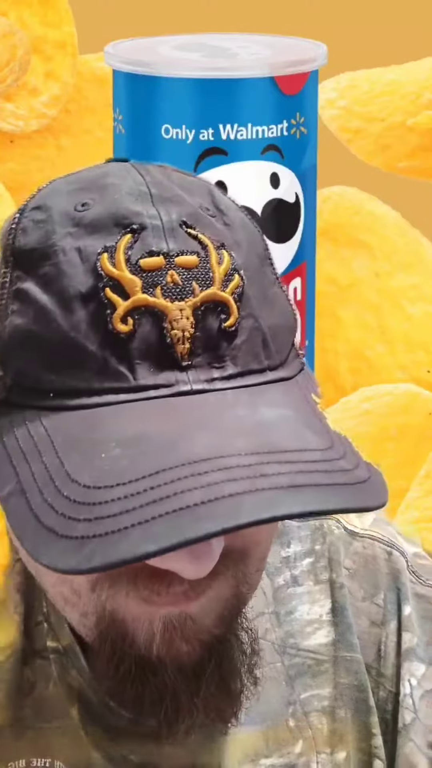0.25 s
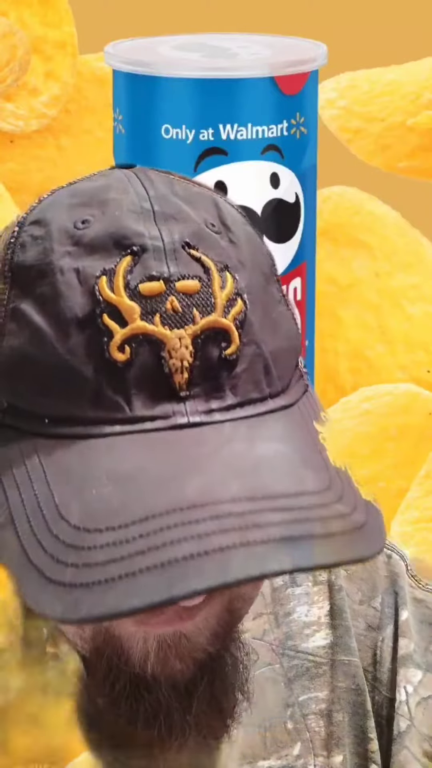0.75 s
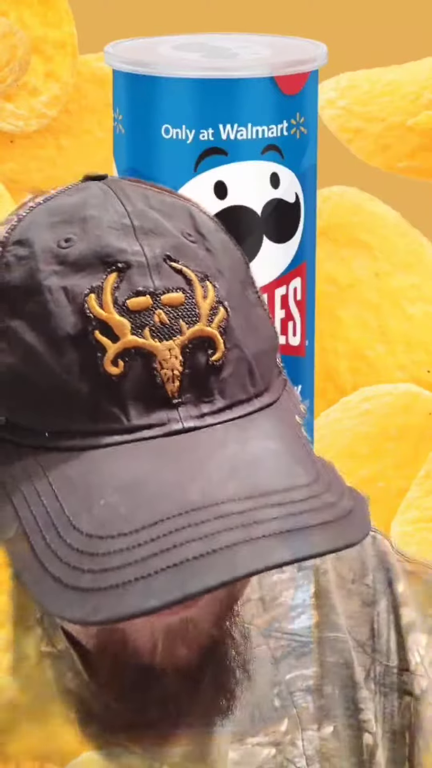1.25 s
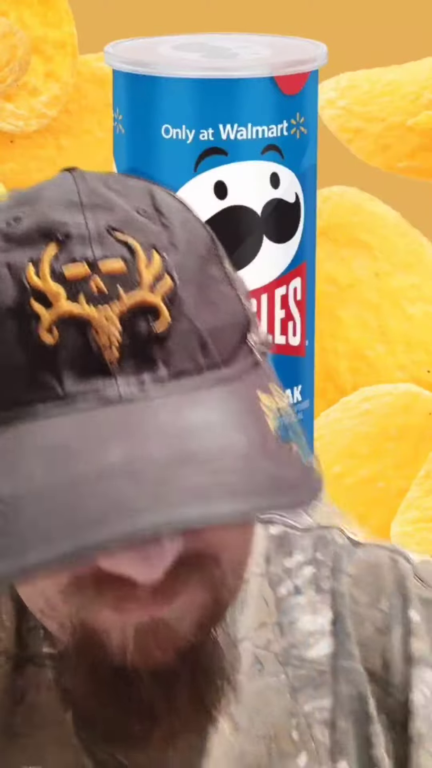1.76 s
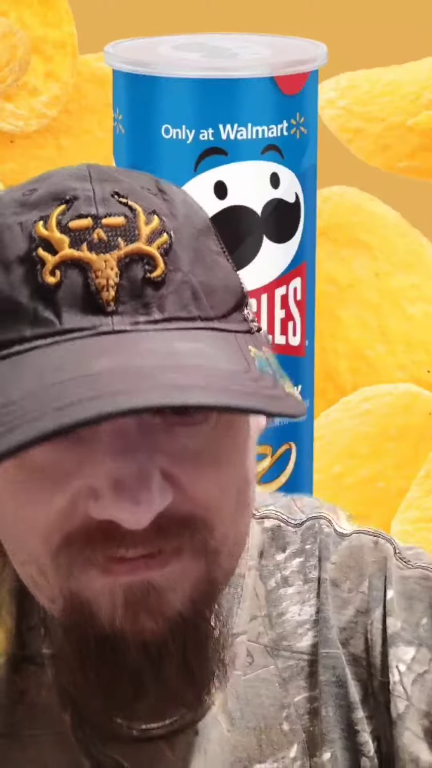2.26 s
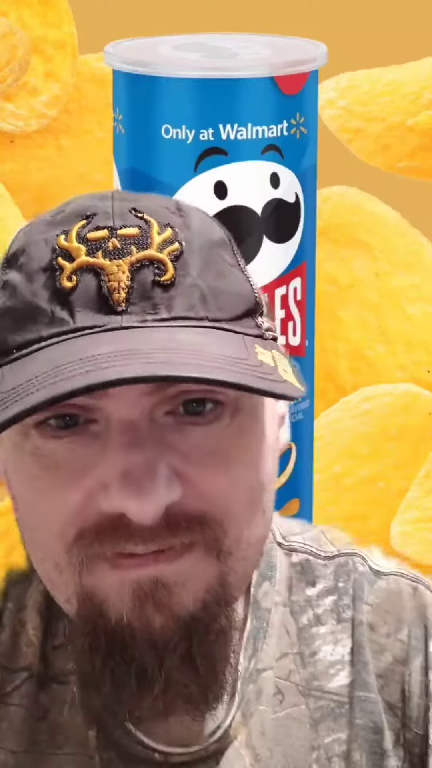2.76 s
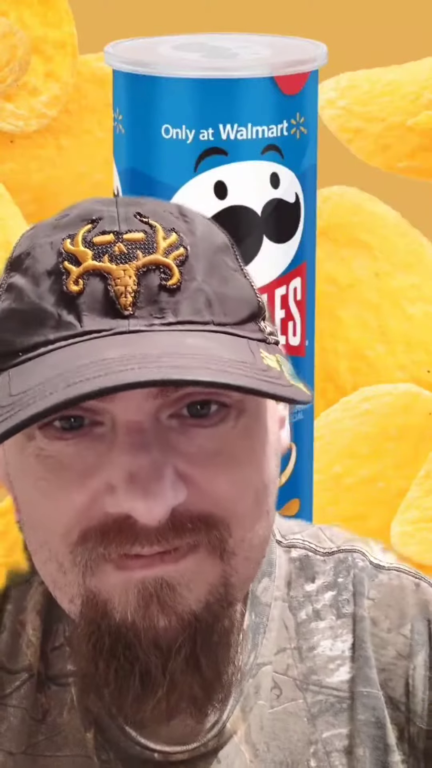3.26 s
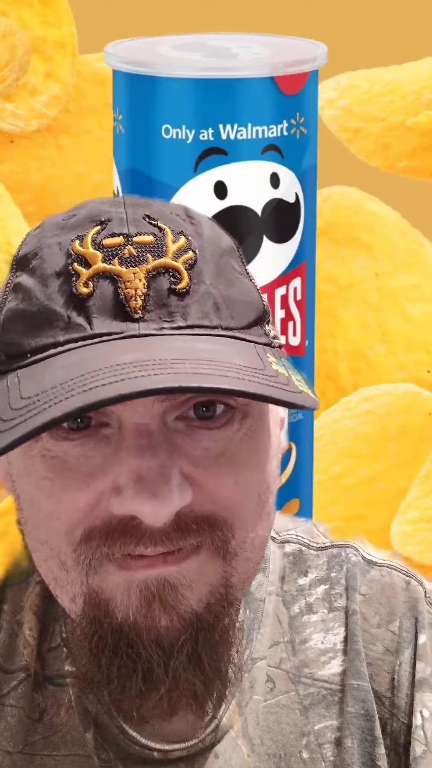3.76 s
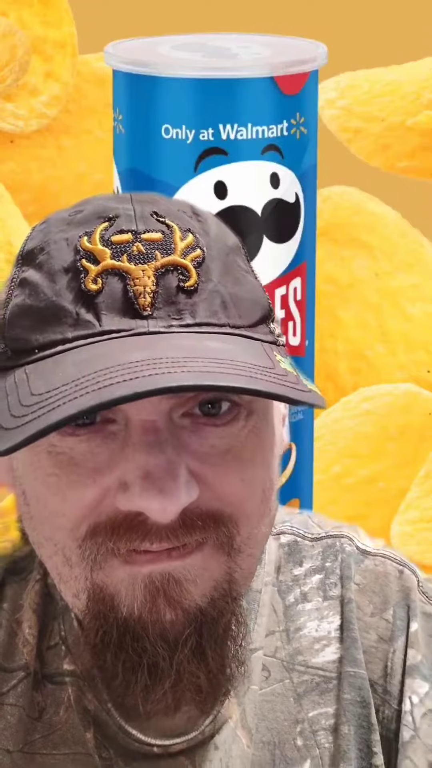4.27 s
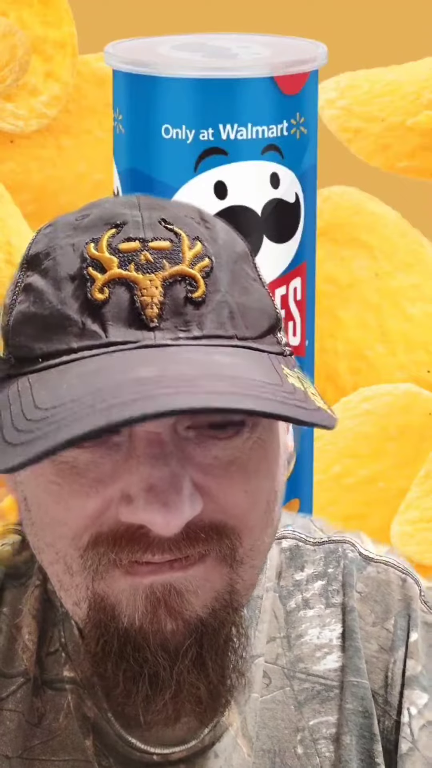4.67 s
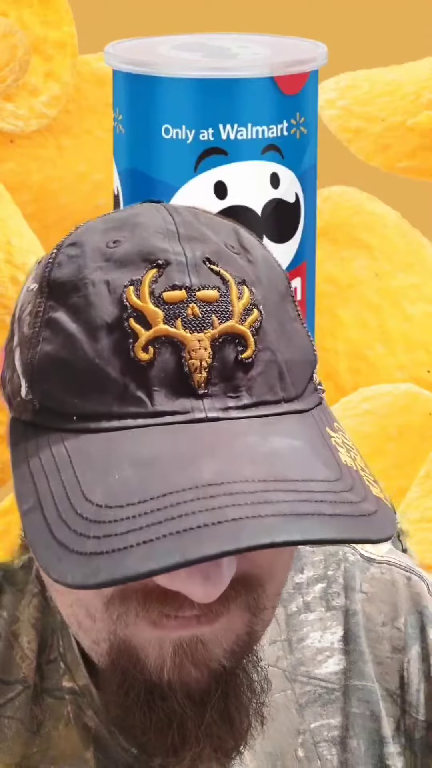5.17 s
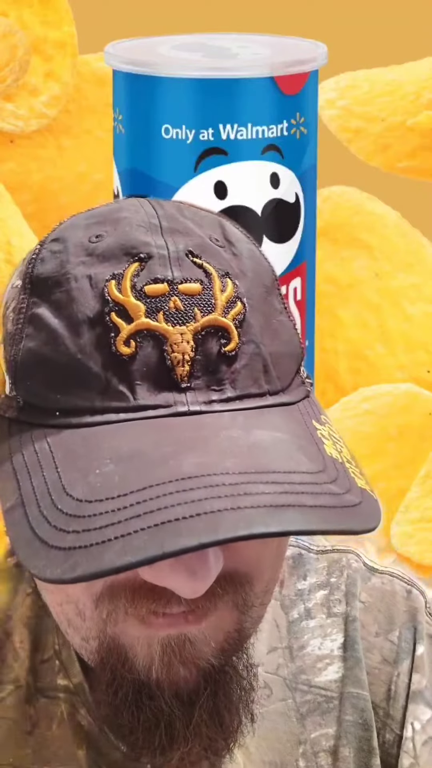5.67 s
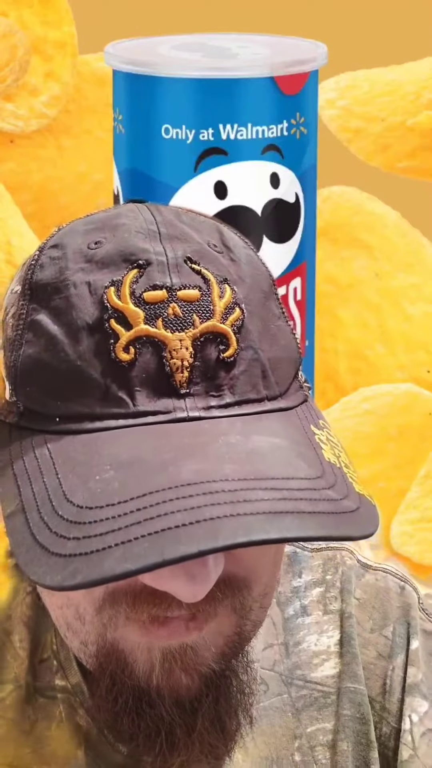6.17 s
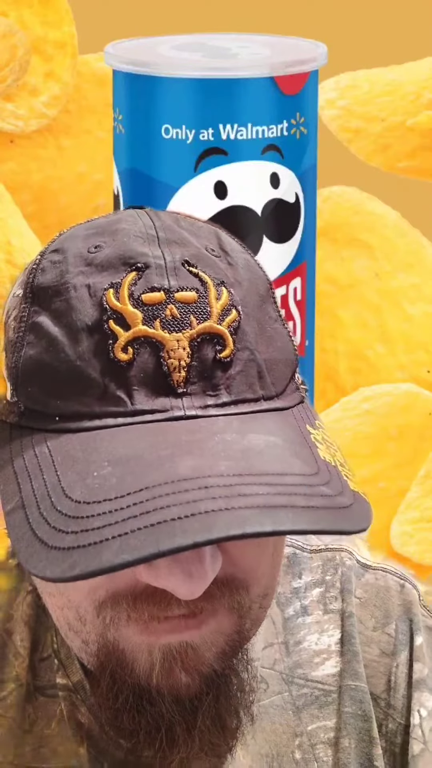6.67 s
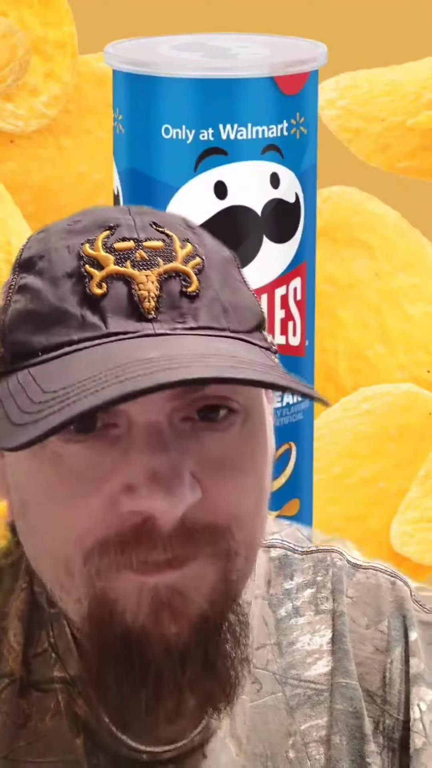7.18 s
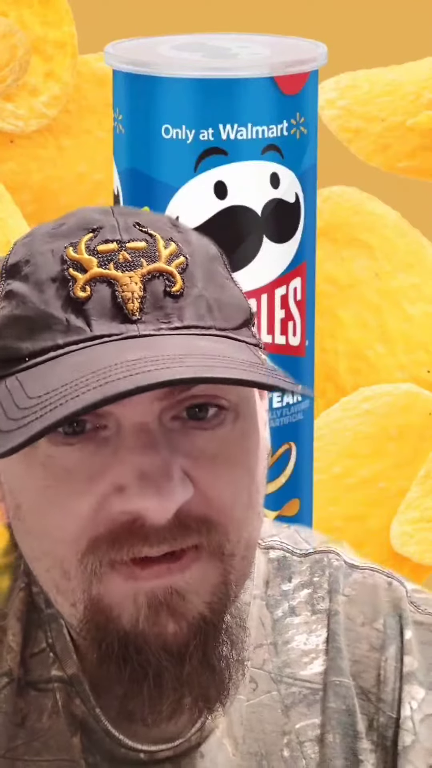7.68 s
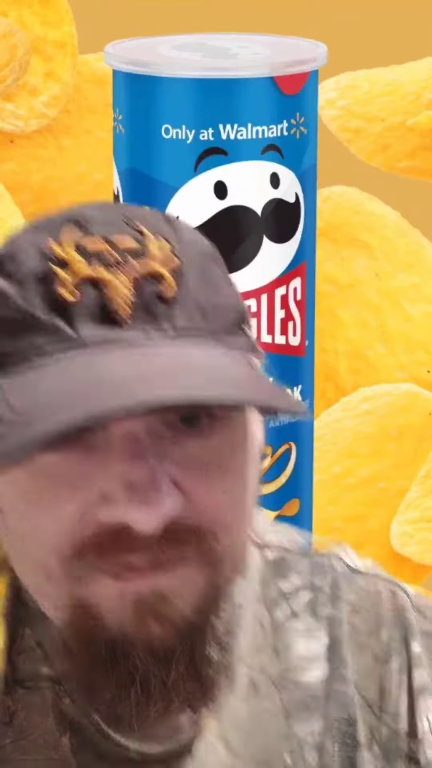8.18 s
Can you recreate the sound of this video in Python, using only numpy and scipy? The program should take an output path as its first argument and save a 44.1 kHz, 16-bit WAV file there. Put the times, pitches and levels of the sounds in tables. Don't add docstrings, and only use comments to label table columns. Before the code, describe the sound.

A small, quiet indoor room with a soft steady hush, a very faint low appliance hum and a short echo; the phone microphone is very close. From 0 to 0.9 s, fingers scuff a cardboard tube, with small taps and a firmer clack near 0.5. Around 0.95-1.1 s the plastic lid pops off in a loud, tight cluster of hollow, woody clacks, the loudest moment, trailing off in little taps. From 1.9 to 4.5 s it is nearly quiet: faint rubbing and sparse, tiny nail ticks, a few clearer near 2.7 and 3.25, while a distant chair groans low, sliding down, at 2.1-2.7. At 4.6 s the foil seal snaps loose, crackling in bright uneven jerks until about 5.4, with low hollow booms from the tube. From 5.7 s crisps softly slide and knock, strongest near 7.0 and 7.45, fading into light rustle by 8.4.

```python
import sys
import numpy as np
from scipy import signal
from scipy.fft import rfft, irfft, next_fast_len
from scipy.io import wavfile
from scipy.ndimage import uniform_filter1d, map_coordinates

SR = 44100
rng = np.random.default_rng(int(sys.argv[2]) if len(sys.argv) > 2 else 0)


def decibels_to_gain(level_db):
    exponent = np.asarray(level_db, float) / 20
    return 10 ** exponent


def int16_out(signal):
    q = np.round(np.clip(np.atleast_2d(signal).T, -1, 1) * 32767)
    wavfile.write(sys.argv[1], SR, q.astype(np.int16))


N = 371013

# (frequency [Hz], density [dB per Hz])
ROOM_TONE = [(15, -25), (25, -6.5), (103, 0), (240, -8), (358, -6.5), (563, -12.5), (644, -11), (1040, -16),
             (1870, -13.5), (2190, -20), (4150, -19), (13400, -31.5), (14500, -39.5)]
# (frequency [Hz], level [dB rms])
APPLIANCE_HUM = [(59, -80.5), (178, -80.5), (292, -77.5), (361, -75.5)]
# (frequency [Hz], t60 [s])
ROOM_DECAY = [(150, 0.33), (1000, 0.16), (4000, 0.2), (12000, 0.33)]
# (time [s], pitch [Hz], level [dB])
CHAIR_GROAN = [
    (2.02, 109.3, -75),
    (2.206, 106.4, -57.5),
    (2.338, 109, -59),
    (2.4, 98, -53),
    (2.438, 94.8, -61),
    (2.47, 95.5, -52),
    (2.694, 96.4, -62.5),
    (2.764, 82.5, -77),
    (2.8, 85, -77),
]

# (frequency [Hz], width [Hz], level [dB])
WALL = [(689.3, 360, 3), (986, 270, 8), (1234, 670, 4), (1670, 320, -4)]
# (frequency [Hz], width [Hz], level [dB])
FOIL = [(2060, 964, 1), (3240, 773, 2), (4030, 875, -1)]
# (frequency [Hz], width [Hz], level [dB])
END_DISC = [(1480, 460, -3.5), (2485, 1100, 1.5)]
# (frequency [Hz], width [Hz], level [dB])
AIR_COLUMN = [(178, 90, -7.5), (237.5, 46, 0.5), (429, 320, -6)]
# (frequency [Hz], density [dB per Hz])
FIZZ = [(2800, -54), (4800, 3), (6500, -5), (9000, -7), (13800, -10), (15500, -46)]
# (frequency [Hz], density [dB per Hz])
SPARKLE = [(2000, -30), (4000, -1.5), (6500, -4.5), (9000, -12.5), (13800, -11.5), (15500, -46.5)]

# (time [s], peak [dB], boom [Hz], t60 [s])
THUMPS = [(0.215, -45.5, 195, 0.059), (0.482, -30, 390, 0.026), (0.701, -54, 336, 0.066),
          (0.848, -40.5, 160, 0.028), (1.021, -14, 338.3, 0.025), (1.024, -28, 118, 0.071),
          (1.026, -26, 540, 0.06), (3.493, -57, 92, 0.065), (4.612, -21.5, 112, 0.078),
          (4.614, -32, 72, 0.19), (4.622, -22.5, 178, 0.099), (4.68, -36.5, 214.5, 0.2),
          (4.897, -34.5, 221.7, 0.33), (4.923, -37.5, 239.3, 0.19), (5.097, -33.5, 306, 0.11),
          (5.181, -43.5, 527, 0.033), (5.308, -40.5, 445, 0.051), (5.341, -45, 100, 0.083),
          (6.521, -37.5, 188, 0.02), (6.708, -55, 246, 0.28), (6.862, -48, 259, 0.13),
          (7.139, -54.5, 122, 0.12), (7.446, -37.5, 275.5, 0.19), (7.901, -52, 244, 0.18)]

# (time [s], length [s], first pressure [dB],
# last pressure [dB], brightness [dB])
PRISING = [(0, 0.33, -56, -65.5, -6.5), (.215, 0.028, -65, -58, -18), (.29, 0.23, -80, -54, -11),
           (.487, 0.01, -31, -47.5, -20), (.66, .06, -66, -52.5, -16), (.797, 0.11, -43.5, -61, -8),
           (.9, 0.045, -66, -62.5, -13), (.944, 0.019, -28, -36.5, -7.5), (.97, .05, -44.5, -35, -0.5),
           (1.024, 0.015, -26, -25, -5.5), (1.04, 0.047, -23, -37, -3), (1.12, 0.17, -35.5, -67, -40),
           (1.357, 0.2, -59, -71, -27), (1.68, 0.024, -52.5, -47.5, -1), (1.71, 0.15, -51, -72, 1),
           (1.835, 0.055, -59, -57.5, -5.5)]
# (time [s], length [s], first pressure [dB], last pressure [dB], brightness [dB])
FEELING = [(1.9, 0.504, -66, -71, -2), (2.39, 0.025, -76.5, -82, 22.5), (2.45, 0.32, -69.5, -61.5, -0.5),
           (2.685, 0.16, -70, -56, -3.5), (2.9, 0.14, -64.5, -58.5, -2), (3.08, 0.13, -76, -61.5, 1.5),
           (3.243, .02, -66, -75, 0), (3.31, 0.061, -69, -61.5, 7.5), (3.56, 0.025, -59.5, -57, 1),
           (3.59, 0.072, -78.5, -68.5, 6.5), (3.78, 0.21, -69, -62, -2.5), (3.96, 0.089, -70, -82, -6),
           (4.15, 0.17, -79.5, -67.5, 0.5), (4.36, 0.082, -80, -67, 3), (4.5, 0.026, -66, -70, -11),
           (4.57, 0.048, -90, -59, 4)]
# (time [s], length [s], first pressure [dB], last pressure [dB], brightness [dB])
PEELING = [(4.625, 0.12, -27, -46, -3.5), (4.805, 0.018, -45, -56, -19), (4.83, 0.089, -43, -29, -10),
           (4.929, 0.032, -21, -34, -6.5), (4.96, 0.076, -32.5, -32, -5.5), (5.04, 0.096, -35, -28, -10.5),
           (5.18, 0.031, -55, -59, 2.5), (5.243, 0.035, -37.5, -50, -27), (5.308, 0.077, -42, -47.5, -2.5),
           (5.36, 0.044, -41, -46, -12), (5.44, 0.2, -63.5, -65, -9)]
# (time [s], length [s], first pressure [dB],
# last pressure [dB], brightness [dB])
TILTING = [(5.74, 0.046, -46, -53, -4.5), (5.81, 0.28, -60.5, -55.5, -3.5),
           (6.105, 0.034, -47, -53.5, -4.5), (6.17, 0.036, -49, -61, -6.5), (6.23, 0.06, -59, -54, -5),
           (6.33, .13, -58, -49.5, -4.5), (6.46, 0.25, -52.5, -49.5, -5.5), (6.7, 0.27, -57, -56, -4.5),
           (6.945, 0.032, -44.5, -45, -3), (6.977, 0.025, -34.5, -46.5, -1.5),
           (7.08, 0.059, -58, -44, -3.5), (7.14, 0.21, -51.5, -48.5, -5.5),
           (7.37, 0.06, -52.5, -37.5, -4.5), (7.447, 0.029, -25.5, -36, -4.5), (7.5, 0.083, -50, -36.5, -8),
           (7.585, 0.07, -53, -49.5, -5.5), (7.7, 0.085, -51.5, -57, -1.5), (7.79, 0.26, -56, -55, -2.5),
           (8, 0.15, -58, -57.5, -3), (8.22, 0.063, -62.5, -62.5, 0), (8.3, 0.14, -71, -68, 1)]
# (strokes, fizz over foil [dB], air column over wall [dB], end disc over wall [dB],
# release [dB per s])
ACTIONS = [
    (PRISING, -3.5, -6.5, -12, 500),
    (FEELING, -5.5, -9, -6.5, 400),
    (PEELING, -1.5, -7, -6, 3600),
    (TILTING, -6, -4.5, -11.5, 330),
]

# (time [s], peak [dB], ring [Hz], sharpness [dB])
LID_SNAPS = [(0.281, -51.5, 910, -35), (0.325, -47, 920, -55), (0.376, -39, 870, -32),
             (0.484, -19, 1049, -23), (0.64, -51, 1120, -26), (0.794, -24, 1300, -15.5),
             (0.815, -39.5, 850, -11), (0.83, -38, 422, -34), (0.854, -36, 980, -30),
             (0.915, -52.5, 3495, -10.5), (0.941, -27.5, 1200, -21), (0.95, -18.5, 888, -25),
             (0.976, -31, 1420, -25), (0.987, -23.5, 1340, -15), (1, -12.5, 4020, -34.5),
             (1.004, -5.5, 1100, -15), (1.022, -4.5, 836, -18.5), (1.0245, -7, 3960, -17.5),
             (1.032, -13, 1220, -24.5), (1.041, -16, 950, -18), (1.065, -14.5, 844, -23.5),
             (1.155, -30, 1083, -24), (1.235, -46.5, 1990, -23), (1.362, -34.5, 1438, -59),
             (1.839, -33.5, 976, -47)]
# (time [s], peak [dB], ring [Hz], sharpness [dB])
NAIL_TICKS = [(2.112, -52, 2106, -0.5), (2.217, -47, 1990, -58), (2.397, -50, 1890, -5),
              (2.681, -25, 1613, -54), (2.819, -39.5, 2502, -26), (2.973, -44.5, 1901, -10),
              (3.028, -52, 1830, 1), (3.038, -44.5, 2617, 5), (3.147, -43.5, 5000, -27),
              (3.181, -55, 2533, 4), (3.237, -49.5, 3920, 0), (3.248, -27.5, 1580, -32),
              (3.371, -40.5, 3660, -20), (3.501, -50.5, 3590, -30), (3.661, -46, 3530, -21),
              (3.865, -43, 1864, -31), (3.945, -41, 1320, -20.5), (4.413, -49.5, 3370, -19),
              (4.502, -49.5, 1423, -40)]
# (time [s], peak [dB], ring [Hz], sharpness [dB])
SEAL_SNAPS = [(4.617, -21, 814, -15.5), (4.62, -7, 4249, -19.5), (4.639, -36, 720, -9.5),
              (4.662, -19, 3228, -7), (4.672, -14, 2400, -20.5), (4.697, -9, 3350, -20),
              (4.714, -22, 3040, -14.5), (4.765, -38, 794, -39.5), (4.803, -27.5, 1437, -35),
              (4.811, -27.5, 3600, -15), (4.816, -20.5, 1920, -14.5), (4.861, -26.5, 819, -35),
              (4.886, -23, 2330, -40.5), (4.924, -8.5, 2950, -6.5), (4.948, -18.5, 2394, -4),
              (4.997, -25, 1914, -4.5), (5.04, -18, 2524, -44), (5.093, -23, 990, -43),
              (5.126, -21, 2128, -14), (5.178, -25, 1136, -16), (5.242, -24.5, 2215, -30),
              (5.251, -33.5, 958, -26), (5.266, -39.5, 2050, -19), (5.306, -29.5, 4280, -9),
              (5.317, -35, 1814, 3.5), (5.339, -27.5, 2400, 0.5), (5.344, -33, 2470, 2),
              (5.366, -28.5, 655, -10)]
# (time [s], peak [dB], ring [Hz], sharpness [dB])
CRISP_KNOCKS = [(5.738, -35, 1223, -6.5), (5.759, -41, 1130, -25.5), (5.78, -38, 1120, -41),
                (6.109, -47, 820, -20), (6.248, -41, 857, -21), (6.277, -39, 3180, -42),
                (6.417, -42, 1841, -15), (6.697, -51, 646, 5.5), (6.864, -45, 755, -39),
                (6.946, -33.5, 910, -16), (6.977, -23.5, 1870, -33), (6.979, -25.5, 780, -42),
                (7.126, -36, 895, -38), (7.137, -30.5, 710, -45), (7.197, -35.5, 756, -43),
                (7.265, -35.5, 1050, -16), (7.346, -38, 760, -11.5), (7.413, -27, 980, -26),
                (7.444, -17, 884, -32), (7.483, -29, 850, -34), (7.521, -28, 1810, -31),
                (7.582, -34, 730, -30), (7.7, -45.5, 684, -13), (7.744, -39, 2830, -26.5),
                (7.753, -30, 2140, -23), (7.903, -42, 755, -17), (7.972, -39.5, 764, -3),
                (8.114, -45, 2600, -22), (8.204, -46.5, 1110, -11.5)]
# (time [s], peak [dB], ring [Hz],
# sharpness [dB])
FURTHER_SNAPS = [(1.005, -14.5, 2652, -34.5), (1.046, -15, 2305, -30), (1.073, -18, 900, -33),
                 (1.085, -26, 900, -31), (0.796, -27, 3200, -35), (1.118, -56, 907, -28), (1.124, -27, 1900, -40),
                 (4.3, -52, 1516, -60), (4.872, -27, 1810, -19), (4.876, -30, 3400, -31), (4.903, -30, 2360, -29),
                 (4.915, -31, 2900, -25.5), (4.934, -29, 2900, -20), (4.943, -24, 2000, -20),
                 (4.955, -35, 2500, -22), (5.005, -22, 2900, -21), (5.021, -31.5, 2288, -21),
                 (5.058, -26, 2473, -23), (5.069, -25, 2177, -33), (5.079, -24, 2428, -31),
                 (5.098, -30, 2789, -27), (5.11, -29, 1920, -30), (5.119, -31, 1207, -22), (5.835, -50, 3150, -11),
                 (5.894, -49, 720, -25), (5.998, -47, 780, -10), (6.121, -49, 880, -20), (6.17, -53, 765, -25),
                 (6.249, -38, 3054, -27), (6.443, -42, 3400, -16), (6.464, -43, 2990, -18), (6.61, -44, 800, -14),
                 (6.63, -44, 4790, -35), (6.7, -43, 2120, -18), (6.904, -52, 813, -25), (6.925, -48, 746, -11),
                 (7.385, -40.5, 776, -35), (7.432, -37, 920, -33), (7.451, -31, 3500, -25), (7.462, -27, 900, -20),
                 (7.474, -45, 950, -22), (7.518, -30.5, 780, -27), (7.573, -34, 1786, -27),
                 (7.735, -36, 1740, -28), (7.754, -28, 3300, -30), (7.82, -49, 966, -16), (8.291, -47, 2288, -10),
                 (8.354, -51.5, 2680, -16.5), (8.403, -52, 3025, -19.5)]


def unit(x):
    return x / np.sqrt(np.mean(x ** 2) + 1e-20)


def along(points, hz):
    f, v = np.transpose(points)
    return np.interp(np.log(hz + 1), np.log(f + 1), v)


def curves(rows):
    s, *cols = np.transpose(rows)
    return [np.interp(np.arange(N) / SR, s, c) for c in cols]


def wobble(rate):
    knots = rng.standard_normal(int(N * rate / SR) + 4)
    return map_coordinates(knots, [np.arange(N) * rate / SR])


def filtered(x, response):
    m = next_fast_len(N + SR // 2)
    return irfft(rfft(x, m) * response(np.fft.rfftfreq(m, 1 / SR)), m)[:N]


def coloured(x, points):
    return filtered(x, lambda f: decibels_to_gain(along(points, f)))


def body(modes):
    def response(f):
        total = 0
        for k, (centre, width, db) in enumerate(modes):
            total = total + (-1) ** k * decibels_to_gain(db) * 1j * f * width / (centre ** 2 - f * f + 1j * f * width)
        return total
    return response


def steep_body(modes):
    return lambda f: body(modes)(f) ** 2


def room_tone():
    t = np.arange(N) / SR
    hush_level = decibels_to_gain(-65.5 + 0.27 * wobble(0.65))
    tone = hush_level * unit(coloured(rng.standard_normal(N), ROOM_TONE))
    for hz, db in APPLIANCE_HUM:
        level = decibels_to_gain(db + 4.0 + 1.2 * wobble(3.8))
        tone += level * np.sin(2 * np.pi * hz * t + 1.1 * wobble(8.5))
    return tone


def room(x):
    out, step = np.zeros(N + SR), SR // 4
    for at in range(0, N, step):
        hz, t, z = signal.stft(rng.standard_normal(SR // 2), SR, nperseg=256)
        decay = decibels_to_gain(-60 * t / along(ROOM_DECAY, hz)[:, None])
        tail = signal.istft(z * decay, SR, nperseg=256)[1]
        answer = signal.fftconvolve(x[at:at + step], tail / np.linalg.norm(tail))
        out[at + 550:][:len(answer)] += answer
    return out[:N]


def chair():
    hz, db = curves(CHAIR_GROAN)
    turns = [CHAIR_GROAN[k][0] for k in (0, 1, -2, -1)]
    sounding = np.interp(np.arange(N) / SR, turns, [0, 1, 1, 0])
    phase = 2 * np.pi * np.cumsum(hz) / SR + 0.6 * wobble(25)
    return sounding * decibels_to_gain(db + 3 + 1.2 * wobble(30)) * np.sin(phase)


def thumps():
    out, t = np.zeros(N + SR), np.arange(SR // 4) / SR
    for s, db, hz, t60 in THUMPS:
        boom = np.sin(2 * np.pi * hz * t) + 0.22 * np.sin(2 * np.pi * 1.6 * hz * t)
        envelope = decibels_to_gain(db + 4.5 - 60 * t / t60) * (1 - np.exp(-t * hz / 0.13))
        out[round(s * SR):][:len(t)] += envelope * boom
    return out[:N]


def slips(per_second, spread_db, smooth):
    when, size, sign = rng.random((3, N))
    sizes = decibels_to_gain(-spread_db * np.log(size + 1e-4))
    ticks = (when < per_second / SR) * sizes * np.sign(sign - 0.5)
    return unit(ticks) + smooth * rng.standard_normal(N)


def patchy(x, depth_db):
    z = signal.stft(x, nperseg=256)[2]
    field = uniform_filter1d(rng.standard_normal(z.shape), size=4, axis=0)
    field = uniform_filter1d(field, size=5, axis=1)
    return signal.istft(z * decibels_to_gain(depth_db * unit(field)), nperseg=256)[1][:N]


def pressure():
    attack_s, fizz_follows = 0.002, 1.4
    power, t = np.zeros((5, N)), np.arange(N) / SR
    for strokes, fizz_db, column_db, disc_db, release in ACTIONS:
        for s, length, first_db, last_db, bright_db in strokes:
            turns = s + np.cumsum([-attack_s, attack_s, abs(length), 60 / release])
            span = slice(max(int(turns[0] * SR), 0), int(turns[-1] * SR))
            db = np.interp(t[span], turns, [first_db - 30, first_db, last_db, last_db - 60])
            parts_db = [0, bright_db, fizz_follows * bright_db + fizz_db, column_db, disc_db]
            power[:, span] += decibels_to_gain(2 * (db + np.c_[parts_db]))
    return np.sqrt(power)


def rustle():
    on_wall, on_foil, on_fizz, on_column, on_disc = pressure()
    clumps = decibels_to_gain(2 * wobble(50))
    drive = patchy(slips(per_second=1000, spread_db=1.8, smooth=0.55) * clumps, depth_db=2.5)
    hissing = drive + 2.3 * clumps * rng.standard_normal(N)
    wall = decibels_to_gain(-6.5) * on_wall * unit(filtered(drive, steep_body(WALL)))
    foil = decibels_to_gain(-0.5) * on_foil * unit(filtered(drive, steep_body(FOIL)))
    fizz = decibels_to_gain(-3.0) * on_fizz * unit(coloured(hissing, FIZZ))
    disc = on_disc * unit(filtered(drive, steep_body(END_DISC)))
    column = decibels_to_gain(-1.0) * on_column * unit(filtered(drive, steep_body(AIR_COLUMN)))
    return wall + foil + fizz + disc + column


def snap_ring(t, hz, sharp_db, odd, noise):
    cycles = np.clip(6 - 0.55 * sharp_db, 2, 14)
    ring = decibels_to_gain(-60 * t * hz / cycles) * np.sin(2 * np.pi * hz * t)
    for ratio, level_db, a, b in ((1.15, -5, 0, 1), (1.4, -9, 2, 3)):
        part = hz * ratio * np.exp(0.04 * odd[a])
        level = decibels_to_gain(level_db + 2 * odd[b] - 60 * t * part / cycles)
        ring = ring + level * np.sin(2 * np.pi * part * t)
    shake = unit(uniform_filter1d(noise, size=int(2 * SR / hz)))
    late_wave = decibels_to_gain(-23 - 60 * t * max(hz, 1500) / 190)
    late_wave = late_wave * (1 - np.exp(-(t / 0.014) ** 2))
    ring = ring + late_wave * shake * np.sin(2 * np.pi * 1.12 * hz * t)
    return ring * (1 - np.exp(-t * hz / 2.0))


def clicks():
    rings, cracks, sparks = np.zeros((3, N + SR))
    t = np.arange(SR // 12) / SR
    snaps = LID_SNAPS + NAIL_TICKS + SEAL_SNAPS + CRISP_KNOCKS + FURTHER_SNAPS
    luck = rng.standard_normal((len(snaps), 4))
    hiss = rng.standard_normal((len(snaps), len(t)))
    for (s, db, hz, sharp_db), odd, noise in zip(snaps, luck, hiss):
        span = slice(round(s * SR), round(s * SR) + len(t))
        rings[span] += decibels_to_gain(db + 9) * snap_ring(t, hz, sharp_db, odd, noise)
        burst = decibels_to_gain(db - 60 * t / 0.0061) * (1 - np.exp(-t / 0.00053)) * noise
        trail = decibels_to_gain(db - 7.5 - 60 * t / 0.05) * noise
        cracks[span] += decibels_to_gain(2 + 0.4 * sharp_db + 16) * burst
        sparks[span] += decibels_to_gain(sharp_db + 7.0) * (burst + trail)
    return rings[:N] + filtered(cracks[:N], body(FOIL)) + coloured(sparks[:N], SPARKLE)


def scene():
    background = room_tone() + chair()
    snaps = thumps() + clicks()
    rubbing = rustle()
    echo = room(decibels_to_gain(-12.0) * snaps + decibels_to_gain(-13.5) * rubbing)
    return (background + echo + rubbing + snaps)[None]


def top_cut(x):
    return signal.sosfilt(signal.butter(12, 15270, fs=SR, output="sos"), x)


def record(dry):
    low_hz, top_hz = 30, 14200

    def microphone(f):
        return (1j * f / (low_hz + 1j * f)) ** 4 / (1 + (f / top_hz) ** 40)

    heard = filtered(dry[0], microphone)
    heard = heard / (1 + np.abs(heard / 0.95) ** 6) ** (1 / 6)
    return top_cut(heard[None])


dry = scene()
out = record(dry)
int16_out(out)
```